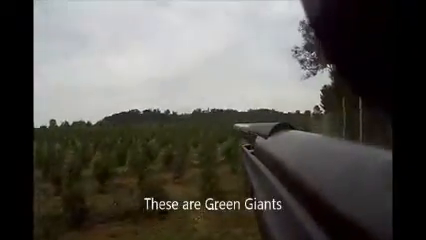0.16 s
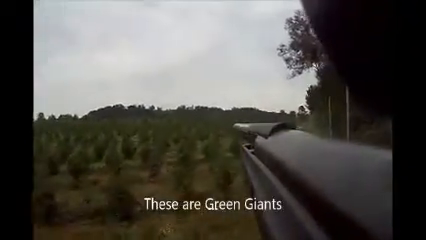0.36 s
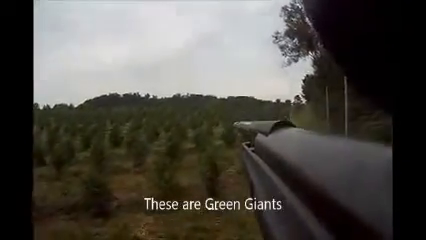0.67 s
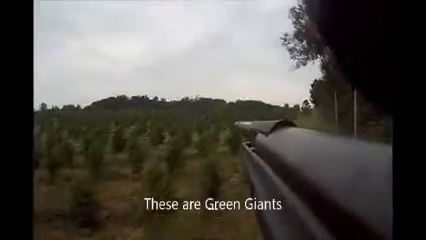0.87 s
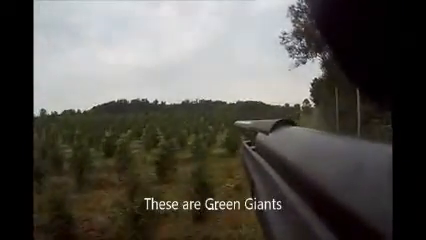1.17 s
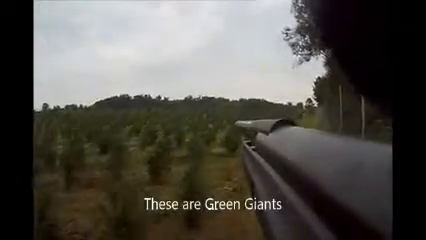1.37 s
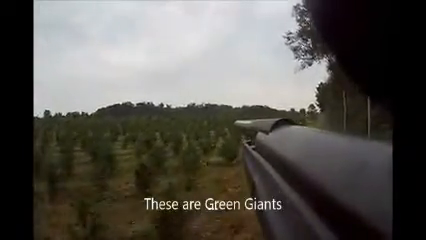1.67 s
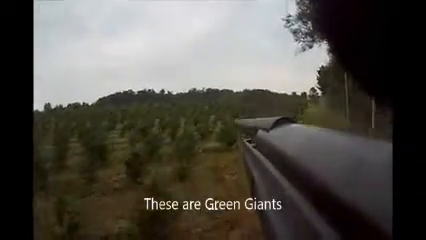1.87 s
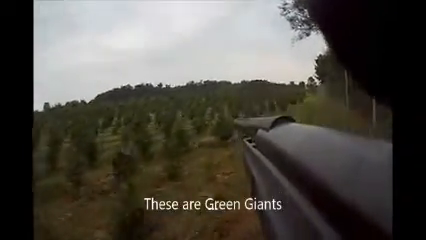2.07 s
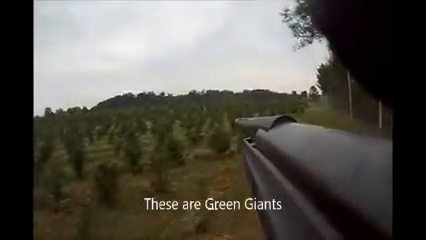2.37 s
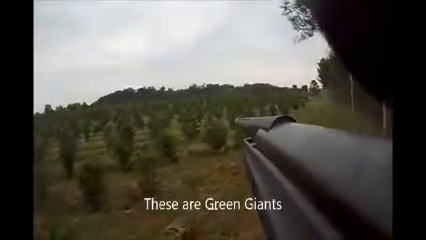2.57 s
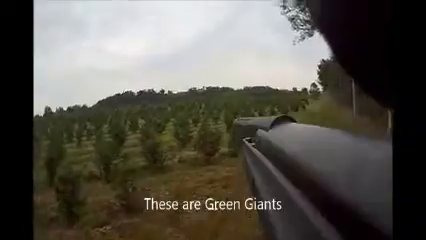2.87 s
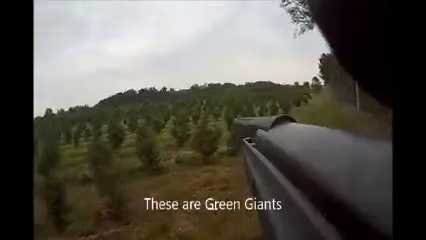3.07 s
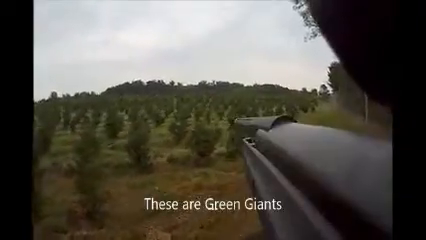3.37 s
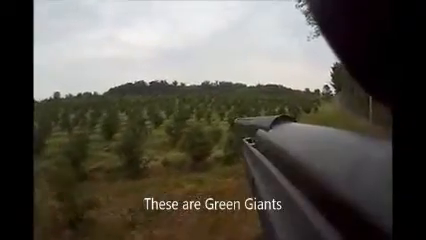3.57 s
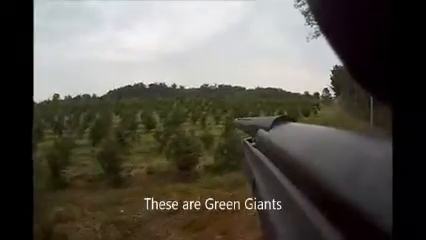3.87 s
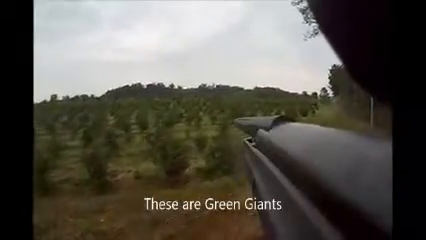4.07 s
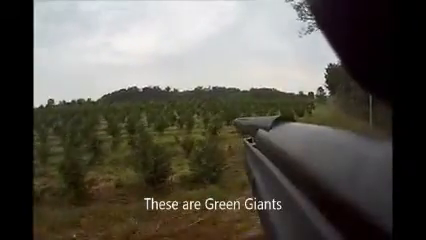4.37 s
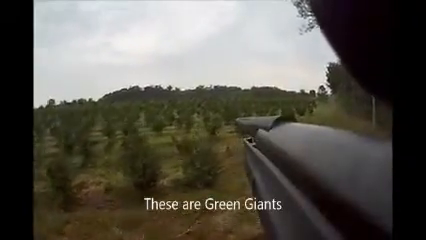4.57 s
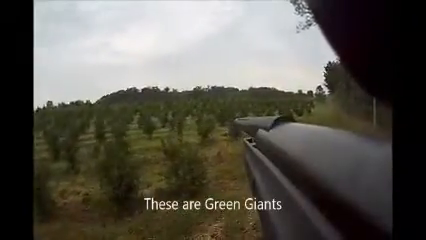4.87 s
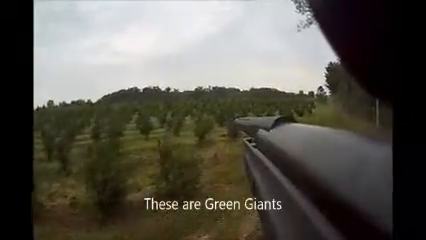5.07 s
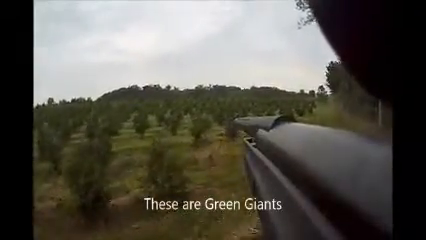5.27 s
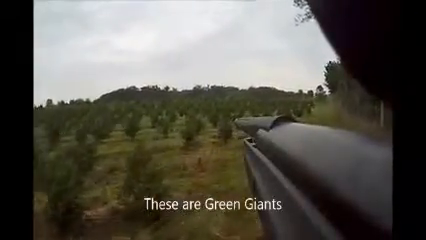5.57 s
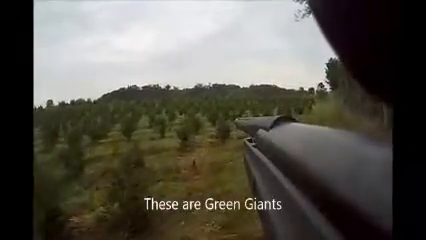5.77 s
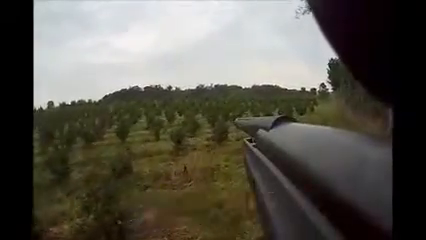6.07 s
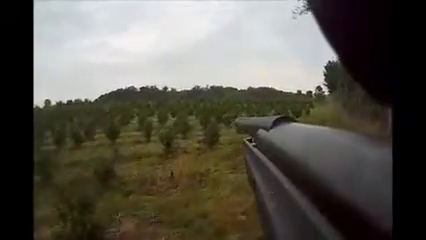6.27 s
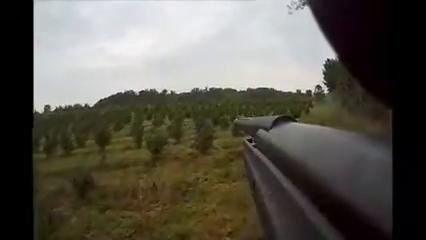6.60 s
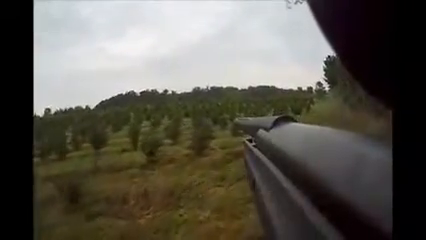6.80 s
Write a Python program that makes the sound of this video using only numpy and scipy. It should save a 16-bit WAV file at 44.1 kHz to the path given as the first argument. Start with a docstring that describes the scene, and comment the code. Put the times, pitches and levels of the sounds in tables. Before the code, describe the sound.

Muffled plastic knocks, rattling scrapes and booming thumps shake a vehicle-mounted camera along a bumpy field, peaking in a distorted slam halfway.

```python
"""A small camera in a hard case rides on a vehicle that jolts over rough ground.
From the start the mount heaves and shakes under scrapes and a thin hiss; knocks soon ring the air in the case
and thumps swing frame and panel as damped modes. Dead bumps follow after a second, a brief squeak past four.
The strongest jolts, most of them near 3.5 s, overload. The camera samples coarsely throughout: direct sound
stops near 4 kHz and faint mirror images lie above it."""
import sys
import numpy as np
from scipy import signal
from scipy.fft import rfft, irfft
from scipy.io import wavfile

SR = 44100
rng = np.random.default_rng(int(sys.argv[2]) if len(sys.argv) > 2 else 0)


def to_wav(sig):
    """Store sig (one row per channel, or 1-D mono) as 16-bit WAV at the path in sys.argv[1].

    Samples outside -1..1 are clipped; the rate is SR.
    """
    pcm = np.clip(np.atleast_2d(sig), -1, 1) * 32767
    pcm = np.round(pcm).astype(np.int16)
    wavfile.write(sys.argv[1], SR, pcm.T)  # frames by channels


N = 306054

# Resonances of the case: five near whole multiples of one pipe note of the air, then four wall notes.
# Columns: pitch_hz, width_hz (of one pass through the resonance), level_db
CASE = [(592, 131, 4), (1273, 298, 0.5), (1855, 206, 4), (2667, 85, -22), (3610, 4430, -11),
        (450, 510, -6.5), (651.3, 69, -9.5), (1643, 220, 2.5), (1068, 550, -6)]
# The two modes of the panel. Columns: rest_pitch_hz, t60_s (after a 0 dB push)
PANEL = [(170, 0.09), (337, 0.1131)]


def gain_of(db):
    """Logarithmic level: decibels to amplitude gain."""
    return 10 ** (np.asarray(db) / 20)


def evened(x):
    """Normalization: scales a signal to rms 1."""
    return x / np.sqrt(np.mean(x ** 2) + 1e-20)


def add(mix, start_s, sound):
    """Superposition: adds a sound into the mix in place, from a given time."""
    part = mix[round(start_s * SR):][:len(sound)]
    part += sound[:len(part)]


def passed(x, hz, kind, order=2):
    """Butterworth filtering, low-pass or high-pass."""
    return signal.sosfilt(signal.butter(order, hz, kind, fs=SR, output="sos"), x)


def parts(x, hz):
    """Band splitting: the dull part below a frequency and the bright part above, each of rms 1."""
    dull = evened(passed(x, hz, "low", order=4))
    bright = evened(passed(x, hz, "high", order=4))
    return dull, bright


def ring(x, hz, width_hz):
    """Second-order resonance: gain 1 at its centre."""
    return signal.lfilter(*signal.iirpeak(hz, hz / width_hz, SR), x)


def noise(spectrum):
    """Spectral shaping: white noise weighted by a (frequency, dB) curve, at rms 1."""
    hz = np.fft.rfftfreq(N, 1 / SR)
    curve_hz, curve_db = np.transpose(spectrum)
    # the curve is straight along a logarithmic frequency axis
    weight = gain_of(np.interp(np.log(hz + 1), np.log(curve_hz + 1), curve_db))
    return evened(irfft(rfft(rng.standard_normal(N)) * weight, N))


def wander(hz):
    """Slow random modulation: low-passed noise of rms 1."""
    return evened(passed(rng.standard_normal(N), hz, "low"))


def along(table):
    """Linear interpolation: each column of a time curve, sample by sample."""
    times_s, *columns = np.transpose(table)
    return [np.interp(np.arange(N) / SR, times_s, column) for column in columns]


def case(x, drift_db=0, shift=1):
    """Cavity resonance: parallel notes of case and air, each at a level that may drift by itself."""
    between_db = -8.5  # what passes between the resonances
    rings = 0
    for hz, width_hz, db in CASE:
        drive = x * gain_of(drift_db * wander(6)) if drift_db else x
        once = ring(drive, hz * shift, width_hz)
        rings = rings + gain_of(db) * ring(once, hz * shift, width_hz)
    return passed(rings + gain_of(between_db) * x, 3900, "low", order=6)


def contact():
    """Power addition: light rolling plus scrapes that set in, sag and decay, returned as three gains."""
    # Light rubbing between the scrapes. Columns: time_s, dull_db, bright_db, shake_db
    roll = [(0, -57, -71, -54), (0.35, -48.5, -65, -44), (1.05, -55, -53.5, -38), (1.4, -55.5, -56.5, -43),
            (1.7, -60.5, -58.5, -50.5), (2.3, -54.5, -57.5, -47.5), (2.8, -77, -64, -59),
            (3.12, -59, -57.5, -52), (3.4, -64, -63, -73), (3.84, -45, -57, -32), (4.45, -51, -49, -40.5),
            (4.58, -59.5, -75, -39.5), (5.0, -52, -65.5, -46), (5.6, -56.5, -67, -53),
            (6.1, -63.5, -76, -49), (6.5, -54, -86, -47), (6.94, -59, -87, -56)]
    # Scrapes as the case rubs and shifts. Columns: start_s, length_s, dull_db, bright_db, shake_db
    scrapes = [(0.0, 0.0074, -36, -37.5, -26), (0.082, 0.038, -41, -38.5, -28),
               (0.171, 0.13, -49.5, -71, -46), (0.416, 0.15, -41.5, -50.5, -41),
               (0.61, 0.04, -36.5, -46.5, -42), (0.74, 0.069, -45, -45.5, -29),
               (0.832, 0.125, -43, -47.5, -28.5), (0.953, 0.09, -39, -33.5, -24),
               (1.137, 0.092, -44, -44.5, -31.5), (1.503, 0.13, -46, -54, -44),
               (1.547, 0.038, -76, -45.5, -22), (2.093, 0.077, -67, -52, -57),
               (3.155, 0.035, -39.5, -62, -12.5), (3.478, 0.041, -35.5, -32, -9.5),
               (3.669, 0.12, -32.5, -42.5, -24), (3.809, 0.048, -47, -49, -45),
               (3.89, 0.072, -44, -64, -23.5), (4.003, 0.11, -39.5, -36.5, -21.5),
               (4.154, 0.059, -39.5, -41, -17), (4.233, 0.063, -33.5, -35.5, -29),
               (4.315, 0.07, -35.5, -38.5, -29.5), (4.59, 0.28, -40.5, -57.5, -27),
               (4.814, 0.033, -43, -47, -28), (5.148, 0.077, -52, -39.5, -26.5),
               (5.384, 0.076, -45.5, -51.5, -35), (5.865, 0.069, -51.5, -61, -33.5),
               (6.222, 0.14, -48, -64.5, -43), (6.672, 0.08, -48.5, -48.5, -44)]
    bite_s, sag_db_per_s = 0.005, 35
    release_db_per_s = (682, 682, 304)  # dull, bright, shake: the mount shakes on a little longer
    power = gain_of(along(roll)) ** 2
    t = np.arange(SR // 2) / SR
    for start_s, length_s, *levels_db in scrapes:
        for row, db, fall_db_per_s in zip(power, levels_db, release_db_per_s):
            release_db = fall_db_per_s * np.maximum(t - length_s, 0)
            shape = gain_of(db - sag_db_per_s * t - release_db)
            add(row, start_s, (np.minimum(t / bite_s, 1) * shape) ** 2)
    return np.sqrt(power)


def scraping(dull_gain, bright_gain):
    """Frictional excitation: random grit and noise drive the case resonances."""
    smooth_below_db = -46  # lighter rubbing than this is smoother
    roughness = np.minimum(dull_gain / gain_of(smooth_below_db), 1)
    grain_size = gain_of(2.8 * np.minimum(rng.exponential(1, N), 5))
    present = rng.random(N) < 220 / SR  # on average 220 grains a second
    grit = evened(grain_size * present * rng.choice([-1, 1], N)) * roughness
    unsteady = gain_of(2.3 * wander(45) * roughness)  # contact comes and goes
    rubbing = (1.3 * grit + rng.standard_normal(N)) * unsteady
    # a moving contact favours now one note, now another
    dull, bright = parts(passed(case(rubbing, drift_db=3.5), 250, "high"), 850)
    return dull_gain * dull + bright_gain * bright


def shaking(shake_gain):
    """Forced vibration: low noise shakes the mount and makes the panel resonate along."""
    # Columns: frequency_hz, density_db (per Hz, relative)
    shake_colour = [(40, 14), (80, 14), (130, -5.5), (250, -4.5), (450, -32.5), (900, -71)]
    shake = noise(shake_colour)
    panel = 0
    for (hz, t60_s), db in zip(PANEL, (-2, -12)):
        panel = panel + gain_of(db) * evened(ring(shake, hz, 5.7 / t60_s))
    return shake_gain * gain_of(0.34 * wander(27)) * evened(shake + panel)


def heaving():
    """Amplitude modulation: very low noise swells and sinks along a slow curve."""
    # Columns: time_s, level_db
    sway = [(0.0, -20), (0.77, -26), (1.08, -27), (1.29, -31), (1.68, -34.5), (1.85, -36.5), (2.3, -29.5),
            (2.98, -38.5), (3.61, -28.5), (4.1, -22.5), (4.23, -26), (5.08, -37.5), (5.2, -29.5),
            (6.2, -40), (6.63, -33.5), (6.94, -42.5)]
    # Columns: frequency_hz, density_db (per Hz, relative)
    sway_colour = [(3, -58), (8, 5), (40, -16), (90, -26), (300, -57)]
    return gain_of(along(sway)[0] + 2 * wander(1.42)) * noise(sway_colour)


def hissing():
    """Stationary noise: a thin hiss of constant level."""
    # Columns: frequency_hz, density_db (per Hz, relative)
    hiss_colour = [(90, -28), (150, -0.5), (400, -8.5), (570, -7), (1120, -14.5), (1310, -11.5),
                   (3000, -19.5), (3750, -14), (4300, -52)]
    return gain_of(-56.5) * noise(hiss_colour)


def ride():
    """Superposition: scraping, shaking and heaving over the hiss, with one contact behind scrape and shake."""
    dull_gain, bright_gain, shake_gain = contact()
    return scraping(dull_gain, bright_gain) + shaking(shake_gain) + heaving() + hissing()


def knocks():
    """Impulse excitation: a sharp tick and a short burst of chatter ring the case."""
    # Columns: start_s, peak_db, bright_db (share of the bright part), length_s (decay time of the chatter)
    knock_table = [(0.069, -15, -27, 0.0055), (0.102, -30, 1, 0.00091), (0.178, -31, 0, 0.0044),
                   (0.504, -30, 5, 0.032), (0.519, -19.5, -11.5, 0.0044), (0.617, -26, -9, 0.0086),
                   (0.644, -26, -41, 0.0013), (0.743, -14, -26, 0.0048), (0.766, -20, -34, 0.0027),
                   (0.787, -41, -32, 0.0054), (0.838, -21.5, -32, 0.0019), (0.858, -9.5, -5, 0.0078),
                   (0.884, -22, 0, 0.019), (0.961, -44, -20, 0.0038), (1.013, -18.5, -3, 0.025),
                   (1.029, -13, -1.5, 0.0072), (1.044, -15.5, -11, 0.0055), (1.141, -25, -29, 0.0015),
                   (1.175, -26, -30, 0.0036), (1.237, -29.5, 0, 0.0013), (1.332, -26, -39, 0.0096),
                   (1.383, -28, -20, 0.0077), (1.557, -6.5, -4.5, 0.0098), (1.622, -33, 2, 0.0062),
                   (2.043, -36.5, -32, 0.0049), (2.086, -19.5, -12, 0.014), (2.106, -2.5, -7.5, 0.0026),
                   (2.303, -27.5, -10, 0.00037), (3.162, -5, -15.5, 0.0083), (3.483, -1.5, -26, 0.0036),
                   (3.492, -7.5, 6, 0.0093), (3.503, -6, 2, 0.0038), (3.509, -6, -13, 0.0031),
                   (3.67, -11, -5, 0.0056), (3.717, -13.5, -3.5, 0.0019), (3.733, -14.5, -35, 0.02),
                   (3.775, -22, -3.5, 0.0038), (3.852, -28, -11, 0.0038), (3.9, -20, -9, 0.0052),
                   (3.924, -22.5, -9, 0.006), (3.942, -23.5, -9, 0.004), (4.004, -17.5, -6.5, 0.0073),
                   (4.066, -19.5, -5.5, 0.0064), (4.088, -22, -13, 0.0055), (4.16, -21, -36, 0.0068),
                   (4.171, -8, -29, 0.0035), (4.189, -15.5, -44, 0.00084), (4.256, -13, -4, 0.008),
                   (4.275, -17.5, 0, 0.002), (4.325, -17.5, -23, 0.0035), (4.375, -28, -1, 0.01),
                   (4.485, -29.5, -5, 0.0016), (4.596, -11.5, -15, 0.0053), (4.825, -18, -9, 0.024),
                   (4.853, -29, -3, 0.004), (4.889, -16, 1.5, 0.0047), (5.115, -25.5, -11, 0.014),
                   (5.153, -16.5, -6, 0.0016), (5.186, -18.5, -14, 0.0018), (5.238, -16.5, -15, 0.0054),
                   (5.451, -21, -2.5, 0.0037), (6.691, -24, -20, 0.0011)]
    tick = 12  # first contact, against chatter that starts at rms 1
    out = np.zeros(N)
    t = np.arange(3000) / SR
    for start_s, peak_db, bright_db, length_s in knock_table:
        shift = rng.uniform(.96, 1.05)  # each blow flexes the case a little differently
        chatter = rng.standard_normal(len(t)) * np.exp(-t / max(length_s, .0004))
        rung = case(chatter - tick * (t == 0), shift=shift)
        dull, bright = parts(passed(rung, 100, "high"), 1030)
        share = np.clip(gain_of(bright_db), 0, .97)
        blow = np.sqrt(1 - share ** 2) * dull + share * bright
        add(out, start_s, gain_of(peak_db) * blow / abs(blow).max())
    return out


def thumps():
    """Damped modal vibration: after a push inward the frame and both panel modes swing and decay."""
    # Columns: start_s, frame_db, frame_hz, frame_t60_s, lower_panel_db, upper_panel_db, panel_hz
    # (levels are those of the decay at its start; panel_hz is the lower note, the upper shifts with it)
    thump_table = [(0.073, -18, 29.3, .3, -31, -33.5, 151), (0.413, -52, 54.4, .2, -20, -69, 144),
                   (0.864, -12.5, 28.4, 0.26, -19, -30.5, 154.4), (1.017, -9.5, 64, 0.12, -16, -52, 165),
                   (1.05, -6.5, 28.7, 0.088, -19.5, -62, 162), (1.21, -11.5, 33.4, .17, -23.5, -60, 165),
                   (1.562, -13, 40, 0.28, 0.5, -44, 165.4), (2.09, -44, 64, 0.19, -17, -42, 168),
                   (2.111, -13, 52, 0.14, -21, -59, 167), (2.298, -21, 66, 0.22, -26, -37.5, 162),
                   (3.16, -3, 57.5, 0.26, -13, -33, 187.5), (3.179, -6, 103, .2, -43, -25.5, 163.6),
                   (3.483, 12, 72.7, 0.026, -4, -13, 170.3), (3.495, 10, 72, 0.065, -11, -23, 187.6),
                   (3.51, 7, 36.5, 0.061, -17, -17, 164.2), (3.531, -12, 53.7, 0.29, -35, -43, 171),
                   (3.671, -5.5, 77, 0.15, -42, -17.5, 170.3), (3.699, -2.5, 27.7, 0.13, -36, -43, 165),
                   (3.73, -10, 78.3, 0.17, -35, -16, 196.2), (3.775, -11.5, 72, .14, -37, -22, 198),
                   (4.161, -1.5, 60.5, .1, -23, -32, 157), (4.169, -20, 71, 0.13, 6.5, -35, 158),
                   (4.246, -15, 80, 0.13, -17, -36, 171), (4.278, -38, 70, .2, -14, -41, 193),
                   (4.323, -39, 60.4, 0.34, -16.5, -25, 173), (4.376, -40, 62, .3, -27, -32.5, 166),
                   (4.6, -23.5, 45.2, 0.38, -22, -29, 170.7), (4.654, -30, 68.6, 0.32, -18, -45, 168),
                   (4.825, -21, 33, 0.13, -19, -28.5, 168), (5.115, -46, 80, 0.28, -21.5, -36.5, 164),
                   (5.156, -29, 52.7, 0.27, -26, -26.5, 170), (5.243, -26, 55, 0.41, -22, -30.5, 168),
                   (5.395, -30, 88, 0.23, -20, -37.5, 163), (5.454, -21, 54, 0.16, -22.5, -46, 169.6),
                   (5.864, -24.5, 43.4, 0.53, -31.5, -58, 167), (6.048, -51, 31.7, 0.22, -29.5, -58, 166),
                   (6.25, -20.5, 66, 0.24, -44, -62, 167.4), (6.285, -22, 29.6, 0.24, -49, -38.5, 167.7),
                   (6.688, -48, 89.3, 0.32, -20.5, -34.5, 163.3), (6.9, -26, 56, 0.39, -37, -57, 159.5)]
    push_s = 0.00072  # a thump sets in softly
    db_per_halving = 40  # a hard push damps the panel sooner
    out = np.zeros(N)
    t = np.arange(SR // 3) / SR
    for start_s, frame_db, frame_hz, frame_t60_s, lower_db, upper_db, panel_hz in thump_table:
        modes = [(frame_db, frame_hz, frame_t60_s)]
        for db, (rest_hz, t60_s) in zip((lower_db, upper_db), PANEL):
            shifted_hz = rest_hz * panel_hz / PANEL[0][0]
            modes.append((db, shifted_hz, t60_s * 2 ** (-db / db_per_halving)))
        swing = sum(gain_of(db - 60 * t / t60_s) * np.sin(2 * np.pi * hz * t) for db, hz, t60_s in modes)
        add(out, start_s, -swing * (1 - np.exp(-t / push_s)))
    return out


def bumps():
    """Overdamped displacement: one dip inward and a slow, weak rebound, without ringing."""
    # Columns: centre_s, level_db, width_s
    bump_table = [(1.176, -6.5, 0.0024), (1.521, -14, 0.0049), (2.093, -8, 0.0029), (2.301, -14, 0.0015),
                  (4.457, -17.5, 0.0025), (4.514, -11.5, 0.004), (6.643, -18, 0.0031)]
    rebound = 0.39  # of the dip
    out = np.zeros(N)
    for centre_s, db, width_s in bump_table:
        u = np.arange(-3 * width_s, 16 * width_s, 1 / SR) / width_s
        dip = np.exp(-u ** 2)
        recoil = rebound * np.exp(-((u - 6) / 4) ** 2)
        add(out, centre_s - 3 * width_s, gain_of(db) * (recoil - dip))
    return out


def squeaks():
    """Narrow-band resonance: rubbing noise is confined to the third pipe note."""
    # Columns: start_s, end_s, level_db
    squeak_table = [(4.325, 4.41, -38)]
    out = np.zeros(N)
    tone = evened(ring(rng.standard_normal(N), CASE[2][0], 19))
    for start_s, end_s, db in squeak_table:
        part = tone[round(start_s * SR):round(end_s * SR)]
        add(out, start_s, gain_of(db) * part * signal.windows.tukey(len(part), .4))
    return out


def scene():
    """Superposition at one microphone, which feeds both channels."""
    return np.tile(ride() + knocks() + thumps() + bumps() + squeaks(), (2, 1))


def mirror_images(narrow, camera_hz):
    """Aliasing as modulation: carriers at multiples of half the camera rate mirror the sound upward."""
    # One column: level_db, from the first multiple upward
    mirrors_db = [-20, -26.5, -28.5, -68]
    tilted = passed(narrow, 1200, "high") + .09 * passed(narrow, 120, "high")  # weakest next to each multiple
    turn = np.pi * camera_hz * np.arange(N) / SR
    # phases in radians: partly shared wavering, so the images differ a little between the channels
    waver = .6 * wander(40) + .55 * np.array([wander(12), wander(12)])
    phase = waver + np.array([[0], [1.2]])
    carriers = sum(gain_of(db) * np.cos(k * turn + phase) for k, db in enumerate(mirrors_db, start=1))
    return passed(tilted * carriers, 3600, "high", order=6)


def record(dry):
    """Clipping and coarse sampling: overload, narrow band, mirror images, left one camera sample late."""
    camera_hz, edge_hz = 7812.5, 15100
    clipped = np.clip(dry[0], -.96, .96)
    band = signal.firwin(301, 3940, window=("kaiser", 8), fs=SR)
    narrow = signal.oaconvolve(clipped, band, "same")
    # a windowed sinc delays by a fraction of a sample
    late = np.sinc(np.arange(-40, 41) - SR / camera_hz) * np.kaiser(81, 6)
    pair = np.array([np.convolve(narrow, late / late.sum(), "same"), narrow])
    pair = pair + mirror_images(narrow, camera_hz)
    edge = signal.firwin(511, edge_hz, window=("kaiser", 9), fs=SR)
    return signal.oaconvolve(pair, edge[None], "same")


dry = scene()
out = record(dry)
to_wav(out)
```